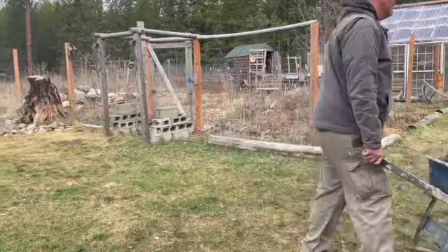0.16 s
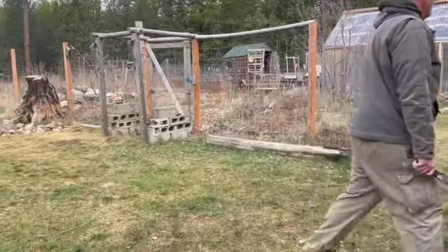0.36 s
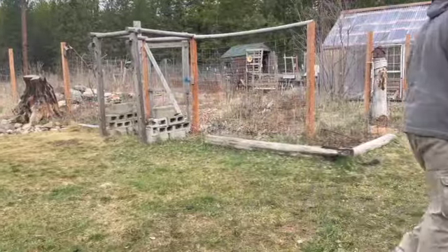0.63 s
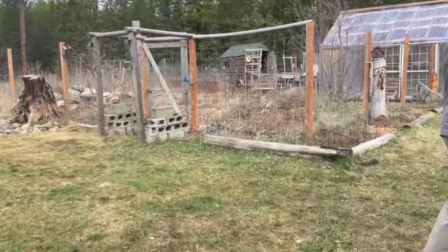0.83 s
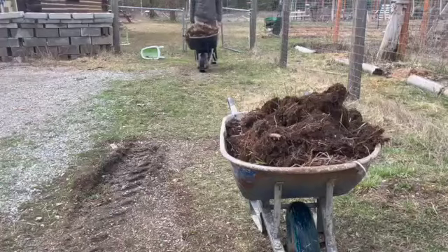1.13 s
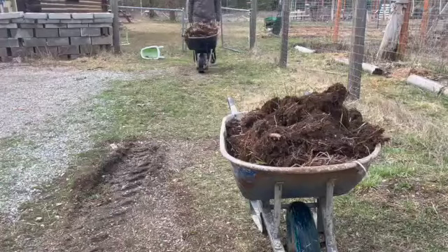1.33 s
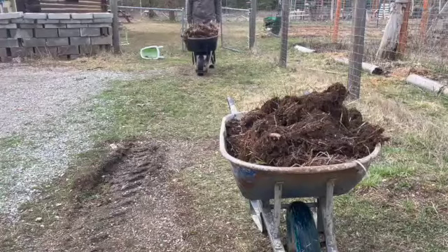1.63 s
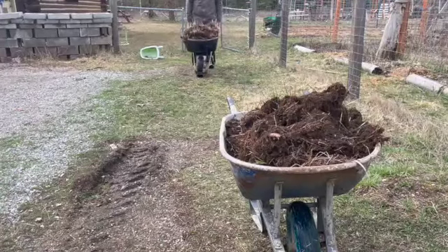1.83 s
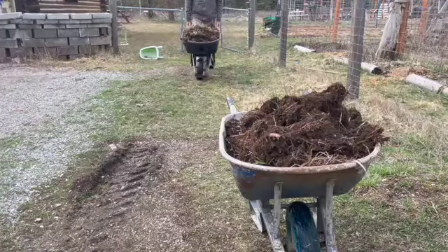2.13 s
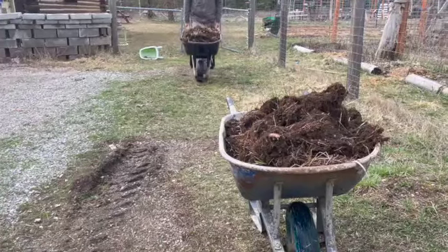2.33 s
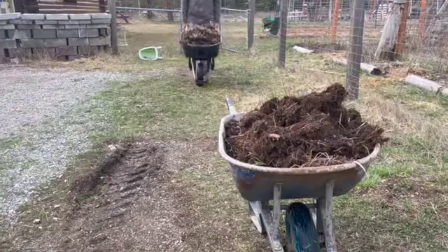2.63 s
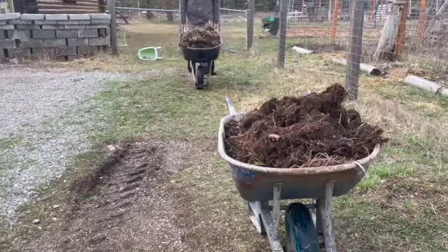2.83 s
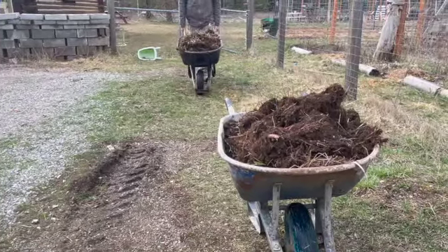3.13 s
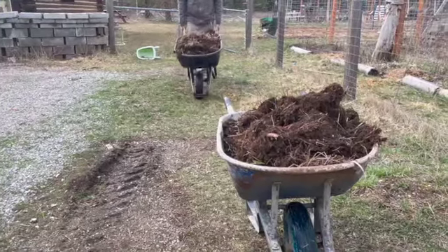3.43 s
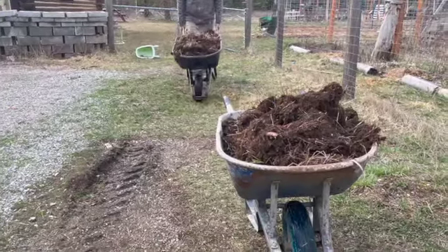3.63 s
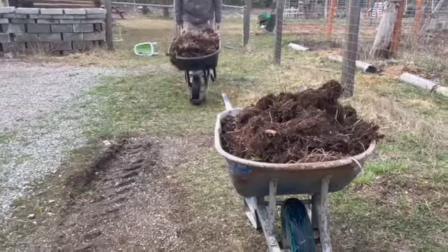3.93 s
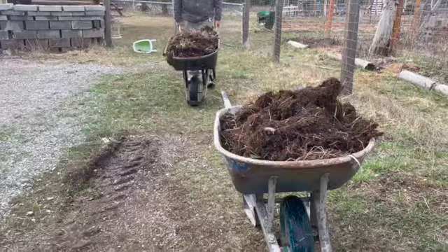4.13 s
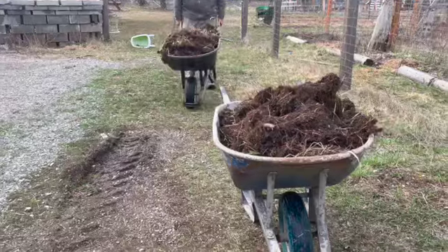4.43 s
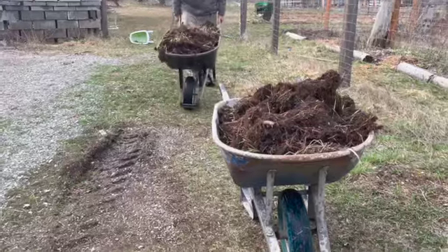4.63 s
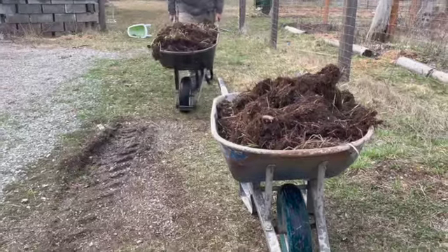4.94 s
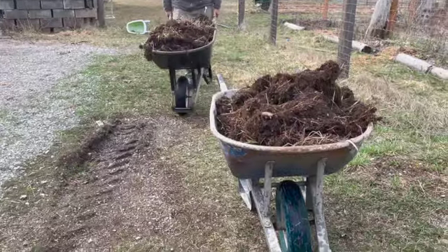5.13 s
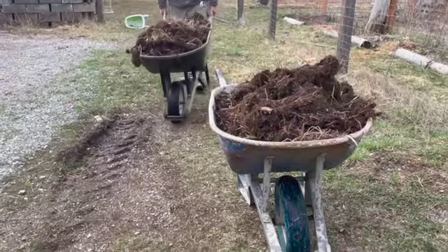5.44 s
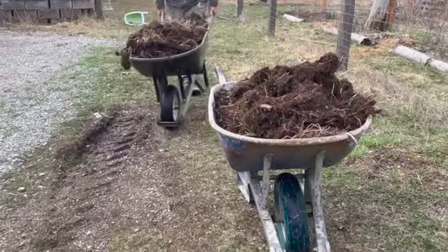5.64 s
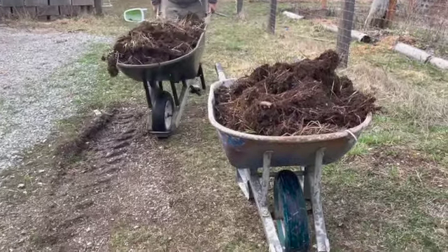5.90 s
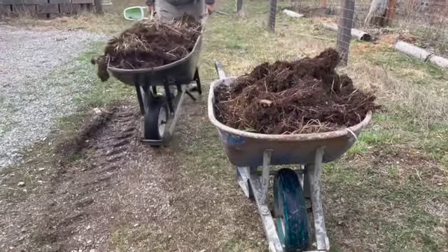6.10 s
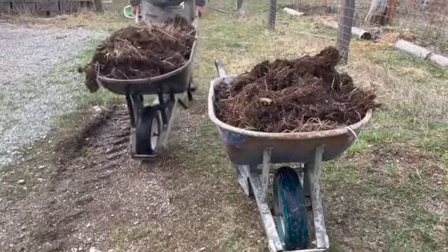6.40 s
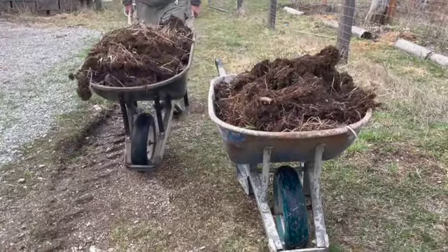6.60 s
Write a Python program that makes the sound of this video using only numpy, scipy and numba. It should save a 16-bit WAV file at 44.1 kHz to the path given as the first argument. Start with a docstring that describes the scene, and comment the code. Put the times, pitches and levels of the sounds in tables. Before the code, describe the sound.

A heavy wheelbarrow comes towards a handheld stereo microphone across grass and gravel. First there is only distant rumble, soft hum and tiny ticks, then a short cut to silence. Bright, scratchy metal creaks follow in irregular clusters, with hollow leg and tub resonances, brief whistles and groans, a dull knock, and finally a raspy, breaking squeal from the axle over thin open-air hiss and light rustle.

```python
"""A loaded wheelbarrow creaks and squeals towards the listener across a yard, after a quiet place and a short gap.
Ragged slips in the dry joints shake resonances of frame, legs and tub; the axle squeals as a shaky harmonic tone.
Gliding sines whistle and groan, and snaps of noise tick underfoot and in the load.
Shaped noise makes the far rumble, hum, open-air hiss, rustle and echoes; two close microphone ports pick it up."""
import sys
import numpy as np
from scipy import signal
from scipy.fft import rfft, irfft, next_fast_len
from scipy.io import wavfile
from scipy.ndimage import uniform_filter1d
from numba import njit

SR = 44100
rng = np.random.default_rng(int(sys.argv[2]) if len(sys.argv) > 2 else 0)


def persist_wave(psi):
    """Save psi, clipped to +-1, as 16-bit WAV."""
    counts = np.round(np.clip(psi, -1, 1) * 32767).astype(np.int16)
    wavfile.write(sys.argv[1], SR, np.atleast_2d(counts).T)


N = 298277
PAD = next_fast_len(N)   # FFT length in samples
SECOND_PLACE_S = 0.97    # the yard with the barrow begins here


def from_db(db):
    """Gain of a level in dB."""
    return 10 ** (np.asarray(db) / 20)


def rms_one(x):
    """Scale to rms 1."""
    return x / np.sqrt(np.mean(x ** 2) + 1e-20)


def in_time(rows, silent=-120):
    s, *columns = np.transpose(rows)
    t = np.arange(N) / SR
    return np.array([np.interp(t, s, c, left=silent, right=silent) for c in columns])


def drift(rate_hz):
    """Random wandering around 0 with rms 1: noise smoothed at a twentieth of the sample rate."""
    r = np.exp(-40 * np.pi * rate_hz / SR)
    noise = rng.standard_normal(N // 20 + 2002)
    slow = signal.lfilter([1], [1, -2 * r, r * r], noise)[2000:]
    return np.interp(np.arange(N) / 20, np.arange(len(slow)), rms_one(slow))


def resonate(x, hz, width_hz):
    """Two-pole resonance with gain 1 on top."""
    r = np.exp(-np.pi * width_hz / SR)
    top = np.array([1, 0, -1]) * (1 - r * r) / 2
    return signal.lfilter(top, [1, -2 * r * np.cos(2 * np.pi * hz / SR), r * r], x + 1e-18)


@njit
def two_pole(x, gain, cosine, r):
    """Resonator whose centre may change at every sample."""
    out = np.zeros(len(x))
    for i in range(2, len(x)):
        out[i] = gain * (x[i] - x[i - 2]) + 1e-18 + 2 * r * cosine[i] * out[i - 1] - r * r * out[i - 2]
    return out


def at_hz(points, column):
    """A column of a frequency table on the FFT grid, joined evenly in log frequency."""
    hz = np.maximum(np.arange(PAD // 2 + 1) * SR / PAD, 1)
    points = np.array(points)
    return np.interp(np.log(hz), np.log(points[:, 0]), points[:, column])


def coloured(spectrum):
    """Two unrelated noises with the given spectrum, rms 1."""
    white = rfft(rng.standard_normal((2, PAD)))
    return rms_one(irfft(white * from_db(at_hz(spectrum, column=1)), PAD)[:, :N])


# Bursts of slipping in the frame.
# Each row: start in seconds, end in seconds, force at the start in dB, force at the end in dB.
CREAKS = [(0.972, 1.005, -29, -42.5), (1.262, 1.328, -32, -33.5), (1.353, 1.424, -39, -36),
          (1.446, 1.456, -39, -41), (1.469, 1.498, -31.5, -38), (1.505, 1.579, -30, -38),
          (1.688, 1.717, -36.5, -58), (1.784, 1.789, -47.5, -56), (2.033, 2.046, -31, -33.5),
          (2.056, 2.141, -28, -34.5), (2.21, 2.255, -32, -39.5), (2.272, 2.32, -29, -54),
          (2.396, 2.428, -27, -46), (2.591, 2.661, -29.5, -34), (2.669, 2.698, -49, -43),
          (2.73, 2.774, -34, -26.5), (2.784, 2.828, -27.5, -23.5), (2.83, 2.899, -24.5, -31),
          (2.903, 2.942, -31.5, -29), (2.946, 3.045, -28, -28.5), (3.055, 3.067, -29, -28.5),
          (3.116, 3.148, -24.5, -51), (3.161, 3.19, -29, -47.5), (3.24, 3.247, -38, -35),
          (3.273, 3.501, -28, -29.5), (3.513, 3.557, -43, -28), (3.6, 3.658, -34, -27),
          (3.688, 3.721, -25.5, -34), (3.822, 3.887, -30.5, -28), (3.893, 4.085, -26.5, -28.5),
          (4.081, 4.104, -22, -26), (4.107, 4.147, -23.5, -25.5), (4.152, 4.169, -25, -39.5),
          (4.477, 4.483, -38, -30), (4.492, 4.537, -30, -26), (4.543, 4.55, -26, -30),
          (4.561, 4.675, -29.5, -30.5), (4.681, 4.71, -28, -34.5), (4.716, 4.747, -29.5, -30),
          (4.757, 4.803, -34, -32.5), (4.824, 4.841, -25, -42), (4.89, 4.904, -29.5, -32),
          (4.925, 4.969, -28, -31.5), (4.979, 5.005, -32, -27.5), (5.016, 5.12, -28.5, -31.5),
          (5.147, 5.212, -32, -42), (5.356, 5.362, -38.5, -35), (5.465, 5.467, -21, -39.5),
          (5.589, 5.592, -24.5, -33.5), (5.622, 5.634, -36.5, -32.5), (5.676, 5.7, -25, -31),
          (5.706, 5.727, -41, -27), (5.902, 5.921, -28, -31.5), (5.975, 5.98, -37, -64),
          (6.099, 6.145, -26.5, -25.5), (6.247, 6.263, -25.5, -29.5), (6.296, 6.322, -25, -23.5),
          (6.353, 6.357, -20, -28.5), (6.376, 6.412, -25.5, -30.5)]


def burst_force():
    """Strength of the slipping: bursts with softened starts and short tails, as the joint lets go and grips."""
    force = np.zeros(N)
    for start, end, start_db, end_db in CREAKS:
        a, b = round(start * SR), round(end * SR)
        force[a:b] = from_db(np.linspace(start_db, end_db, b - a))
    grip = np.exp(-1 / (.0023 * SR))      # the joint grips again within a few ms
    force = np.maximum(force, signal.lfilter([1 - grip], [1, -grip], force))
    loosen = np.exp(-1 / (.0016 * SR))    # and breaks loose faster
    return signal.lfilter([1 - loosen], [1, -loosen], force)


# Moments when the ragged slipping locks onto a nearly steady rate.
# Each row: centre in seconds, rough length in seconds, slips per second.
LOCKS = [(1.29, .05, 350), (1.55, .04, 448), (2.1, .04, 390), (2.825, .05, 476), (2.97, .04, 476),
         (3.015, .04, 357), (3.33, .04, 435), (3.66, .035, 500), (3.92, .05, 430), (4.06, .03, 476),
         (4.7, .03, 640), (5.065, .03, 400), (6.31, .04, 470)]
RAGGED, LOCKED = (.15, 1.8), (.02, .8)   # (jitter as share of a period, spread of sizes in dB)
GRIT_DB = -12   # beside the slips


def slips():
    """Train of uneven clicks, steadier in the locks, with noise as grit between them; rms 1."""
    t = np.arange(N) / SR
    centre, length, locked_rate = np.transpose(LOCKS)
    near = [np.clip(2 - 4 * np.abs(t - s) / span, 0, 1) for s, span in zip(centre, 1.5 * length)]
    lock = np.max(near, axis=0)   # 0 ragged, 1 locked
    rate = np.interp(t, centre, locked_rate) * from_db((1.1 - lock) * drift(25))
    jitter, spread_db = (ragged + (locked - ragged) * lock for ragged, locked in zip(RAGGED, LOCKED))
    at = np.flatnonzero(np.diff(np.floor(np.cumsum(rate / SR))))   # a slip at each full period
    late, size = rng.standard_normal((2, N))[:, at]
    moved = at + (late * jitter[at] / rate[at] * SR).astype(int)
    train = np.zeros(N)
    train[np.clip(moved, 0, N - 1)] = from_db(spread_db[at] * size)
    return rms_one(rms_one(train) + from_db(GRIT_DB) * rng.standard_normal(N))


MODE_WANDER = .005   # each mode's pitch wanders randomly by this share


def wandering(x, hz, width_hz, wander):
    """Resonance with gain 1 on top whose centre wanders."""
    r = np.exp(-np.pi * width_hz / SR)
    cosine = np.cos(2 * np.pi * hz * (1 + MODE_WANDER * wander) / SR)
    return two_pole(x, (1 - r * r) / 2, cosine, r)


# Times in seconds of the four stages, as the barrow turns and nears.
STAGES_S = [1.7, 3.6, 4.9, 6.0]
MODE_SWAY_DB = 1.8   # slow chance in each mode's share


def ring_part(modes, level, motion):
    """One part of the barrow: shaken resonances whose shares change; friction steadies their strength."""
    t, part = np.arange(N) / SR, np.zeros(N)
    # power of white noise through the modes, so that every part starts from equal strength
    power = sum(from_db(stages_db) ** 2 * np.pi * width / SR for hz, width, *stages_db in modes)
    drive = level * motion
    for k, (hz, width, *stages_db) in enumerate(modes):
        sway = drift(7)
        share_db = np.interp(t, STAGES_S, stages_db - 10 * np.log10(power)) + MODE_SWAY_DB * sway
        # the reversed sway serves as the pitch wander
        part += (-1) ** k * wandering(drive * from_db(share_db), hz, width, sway[::-1])
    # friction holds the vibration near what the force allows
    given, taken = uniform_filter1d([level ** 2, part ** 2], size=round(.018 * SR)) + 1e-12
    return part * np.clip(given / taken, .2, 5) ** .45


# Resonances of the joint, the legs, the tub and the friction hiss.
# Each row: pitch in Hz, width in Hz, then the relative share in dB at each of the four stages.
JOINT_MODES = [(2882, 79, 6.5, 0, 1.5, 3), (3063, 254, -13, 0.5, 1.5, -1.5), (3267, 267, 4, 9, 6, 6.5),
               (3385, 280, 10, 7, 2, 3.5), (3884, 143, 3, -4.5, 0.5, -3.5), (4023, 105, 2.5, -5, -2, -3.5),
               (4870, 860, -14.5, -15.5, -12, -11.5), (5070, 82, -14, -6.5, -6, -2.5),
               (7110, 410, -14.5, -16, -17, -20)]
LEG_MODES = [(794, 106, -14, -5, -5, -7.5), (967.5, 21, -6.5, -2.5, -2.5, -19),
             (1050, 15.7, -4, 4.5, 1.5, -7), (1186, 113, -10, -5, -3.5, -7), (1395, 77, -10.5, 3, -6.5, -4),
             (1843, 154, 7, 6, 4.5, 5.5), (1875, 130, 9.5, 8, 4, 2.5), (2072, 61, -8, -1, -2, -1),
             (2342, 115, -25, -4, -3, 0), (2560, 85, -1, -4, -1, 4.5)]
TUB_MODES = [(355, 150, 3, 4.5, 0.3, -5), (407, 86, 5.5, 3.5, -0.8, 3), (472, 14.6, 4.5, -5.5, 2.5, 4.5),
             (583, 290, -13.5, -8.5, -4.5, -7)]
HISS_MODES = [(8720, 3200, 8, 31, 23, 16), (10070, 330, 7, 10, 29, 9), (11700, 11000, -13.5, 2, -27, -24)]
# How strongly the other parts sound beside the joint as the barrow turns and nears.
# Each row: time in seconds, legs in dB, tub in dB, hiss in dB.
PARTS = [(1.0, -2, -13, -10), (1.45, 0, -6.5, -13), (2.05, -4.5, -24.5, -16), (2.3, -4, -14, -14.5),
         (2.65, -7, -23, -13.5), (3.05, -4.5, -14.5, -14), (3.2, -9, -27, -16), (3.55, -5, -14, -14.5),
         (4.15, -6, -12, -12), (4.5, -1, -11.5, -8), (4.75, -0.5, -13.5, -4.5), (5.05, 3, -10, -4.5),
         (5.2, -4.5, -15.5, -16), (5.6, 1, -37, -10), (5.7, 3.5, -10.5, -12), (6.4, 4.5, -8.5, -3.5)]
# legs, tub and hiss follow only a share of the force's swing about its usual level
FOLLOWS, USUAL_DB = [[0.69], [0.54], [0.37]], -35


def creaks():
    """Stick-slip in the dry joints shakes joint, legs, tub and a friction hiss; a strut rings on."""
    force = burst_force()
    swing = (force / from_db(USUAL_DB) + 1e-9) ** np.array(FOLLOWS)
    legs, tub, hiss = swing * from_db(USUAL_DB + in_time(PARTS, silent=None))
    train = slips()
    shaking = rms_one(train + .55 * rng.standard_normal(N))      # the far parts feel the slips blurred
    rubbing = rms_one(.5 * train + rng.standard_normal(N))       # the hiss is mostly plain friction
    out = ring_part(JOINT_MODES, force, train)
    out += ring_part(LEG_MODES, legs, shaking)
    out += ring_part(TUB_MODES, tub, shaking)
    out += ring_part(HISS_MODES, hiss, rubbing)
    strut = resonate(shaking * legs, hz=1075, width_hz=6)   # narrow, so it rings on after each burst
    return out + from_db(16) * strut


# Two passages of axle squeal, before the body colours them.
# Each row: time in seconds, pitch in Hz, level in dB.
SQUEALS = [
    [(0.99, 476, -50), (1.014, 540.5, -46.5), (1.108, 532, -49), (1.145, 459.6, -49), (1.162, 584, -46),
     (1.188, 615, -65), (1.2, 683, -51), (1.278, 678, -53), (1.3, 597, -47)],
    [(5.72, 511, -102), (5.734, 509.4, -36.5), (5.768, 479, -41), (5.79, 515.6, -42.5), (5.815, 510, -35),
     (5.835, 616, -34), (5.885, 579, -35), (5.905, 529.2, -39.5), (5.97, 470.3, -40), (6.042, 565.7, -31),
     (6.06, 521.6, -36), (6.1, 562.6, -32), (6.17, 469.4, -42), (6.195, 557, -27.5), (6.244, 549.7, -34),
     (6.29, 405.6, -38), (6.34, 449.7, -42.5), (6.42, 421.7, -34), (6.443, 591, -29.5),
     (6.462, 565.5, -30.5), (6.478, 489.6, -33), (6.494, 488, -30), (6.508, 442, -35.5),
     (6.523, 547, -29.5), (6.545, 465, -33.5), (6.588, 554, -33.5), (6.6, 544, -63)],
]
# Upper partials of the squeal.
# Each row: time in seconds, second partial in dB, those above in dB.
SQUEAL_EDGE = [(1.09, -2.5, -8), (1.17, -1, -3), (1.3, -18, -14), (5.86, 1.5, -1.5), (6.0, -4, -9),
               (6.24, -3, -13), (6.46, -3.5, -11)]
# The barrow's body colours each partial. Each row: frequency in Hz, gain in dB.
SQUEAL_BODY = [(400, 6), (480, -0.5), (540, -5.5), (690, -2), (850, 4), (1050, -1), (1190, -5.5),
               (1320, 10), (1420, -12.5), (1600, -11.5), (1750, -6.5), (1950, -13), (2250, -14.5),
               (2600, -12.5), (4200, -33)]
SQUEAL_RASP, SQUEAL_BREAK_DB = .45, 3   # depth of roughness, depth of the breaks in dB


def squeal():
    """Regular stick-slip on the axle: a shaky, raspy tone of six partials that breaks as the axle catches."""
    out = np.zeros(N)
    body_hz, body_db = np.transpose(SQUEAL_BODY)
    for rows in SQUEALS:
        a, b = round(rows[0][0] * SR), round(rows[-1][0] * SR)
        pitch, level_db = in_time(rows)[:, a:b]
        second_db, edge_db = in_time(SQUEAL_EDGE, silent=None)[:, a:b]
        phase = 2 * np.pi * np.cumsum(pitch * (1 + .017 * drift(50)[a:b])) / SR
        catch = np.minimum(drift(30), .7)[a:b]   # the axle catches and the whole tone breaks
        for k in range(1, 7):
            db = level_db + np.interp(np.log(k * np.abs(pitch)), np.log(body_hz), body_db)
            db = db + (k == 2) * second_db + (k > 2) * edge_db
            own_break = np.sqrt(k) * np.minimum(drift(32), 1)[a:b] / 2   # higher partials break more
            rasp = 1 + SQUEAL_RASP * drift(200)[a:b]
            uneven = from_db(db + SQUEAL_BREAK_DB * (catch + own_break)) * rasp
            out[a:b] += np.sqrt(2) * uneven * np.sin(k * phase)
    return out


def tub_ring():
    """A tub plate rings on as the squeal stops: one slowly dying sine."""
    start_s, hz, t60_s, db = 6.58, 522, 1.5, -46
    since = np.maximum(np.arange(N) / SR - start_s, 0)
    fade_in = np.minimum(since / 0.018, 1)
    return from_db(db - 60 * since / t60_s) * fade_in * np.sin(2 * np.pi * hz * since)


# Brief gliding tones, from low groans to thin whistles.
# Each row: start in seconds, length in seconds, first pitch in Hz, last pitch in Hz, level in dB.
WHISTLES = [(1.656, 0.018, 3990, 4160, -43), (1.818, 0.28, 3860, 3940, -67),
            (2.284, 0.066, 490, 594, -47.5), (2.981, 0.12, 412, 355, -41), (4.751, 0.041, 3894, 4000, -27),
            (4.891, 0.016, 3850, 3870, -26), (5.041, 0.044, 260, 430, -34.5),
            (5.147, 0.057, 3970, 3797, -29.5), (5.168, 0.051, 1750, 1580, -35),
            (5.296, 0.02, 2514, 2372, -40.5), (5.337, 0.059, 463, 511, -43.5)]
WHISTLE_WAVER_HZ, WHISTLE_RASP = 9, .5   # rms pitch shake, depth of roughness


def whistles():
    """Short gliding sines, a little shaky and raspy, with soft ends."""
    out = np.zeros(N)
    waver = WHISTLE_WAVER_HZ * drift(52)
    rasp = 1 + WHISTLE_RASP * drift(150)
    for s, length, from_hz, to_hz, db in WHISTLES:
        i, n = round(s * SR), round(length * SR)
        pitch = np.linspace(from_hz, to_hz, n) + waver[i:i + n]
        phase = 2 * np.pi * np.cumsum(pitch) / SR
        out[i:i + n] += from_db(db) * np.hanning(n) ** .5 * np.sin(phase)
    return out * rasp


# Small ticks underfoot and in the load.
# Each row: start in seconds, strength in dB, pitch in Hz.
TICKS = [(0.215, -44, 450), (0.391, -41.5, 1860), (0.858, -39, 537), (1.662, -35, 990), (5.338, -26, 526),
         (5.439, -54, 1780), (5.525, -35.5, 1487)]


def ticks():
    """Short dying snaps of noise through a broad resonance."""
    out = np.zeros(N)
    snap = np.exp(-np.arange(600) / (0.0056 * SR))
    for s, db, hz in TICKS:
        i = round(s * SR)
        out[i:i + 600] += 2 * from_db(db) * resonate(rng.standard_normal(600) * snap, hz, 0.64 * hz)
    return out


# Level of the far rumble. Each row: time in seconds, level in dB.
RUMBLE_LEVEL = [(0, -49), (.45, -55), (.92, -49), (1.4, -51.5), (2.0, -54), (4.4, -50.5), (5.5, -52),
                (6.3, -44), (6.76, -53.5)]
# Level of the open-air hiss in the second place. Each row: time in seconds, level in dB.
AIR_LEVEL = [(.97, -54.5), (1.5, -50), (1.9, -55.5), (3.2, -54), (4.4, -56.5), (5.5, -49), (6.05, -50.5),
             (6.76, -50)]
# Spectra of the rumble, the air in the first and second place, and the rustle.
# Each row: frequency in Hz, relative level per Hz in dB.
RUMBLE = [(12, -39), (24, -26), (54, 9), (110, 4.5), (131, 5.5), (166, -7), (236, -23), (323, -14),
          (400, -13), (520, -53)]
FIRST_AIR = [(120, -50), (200, -3), (323, -4), (1060, -16.5), (2440, -13), (3170, -23.5), (7290, -31),
             (8000, -22), (10400, -50)]
AIR = [(120, -1.5), (200, -1), (446, -18), (608, -12), (778, -21), (1060, -15.5), (1490, -14.5),
       (3870, -21.5), (8000, -31.5), (10400, -66)]
RUSTLE = [(3530, -59), (6000, -28), (7400, -4), (9050, -8), (10700, -5.5), (14100, -3.5), (15500, 3.5),
          (16300, -70)]
HUM_HZ, HUM_WIDTH_HZ, HUM_DB = 123.6, 4.9, -55
FIRST_AIR_DB, FIRST_RUSTLE_DB = -63, -72
RUSTLE_DB, NEARING_DB_PER_S = -72.5, 2   # at the second place's start, then rising as the tyre nears


def yard():
    """Far rumble, wavering hum, open-air hiss and the tyre's rustle on the gravel; two unrelated versions."""
    rumble_db, = in_time(RUMBLE_LEVEL, silent=None)
    since = np.arange(N) / SR - SECOND_PLACE_S
    hum = rms_one(resonate(rng.standard_normal((2, N)), HUM_HZ, HUM_WIDTH_HZ))   # narrow noise wavers
    low = from_db(rumble_db + 1.2 * drift(3.0)) * coloured(RUMBLE) + from_db(HUM_DB) * hum
    first_air = from_db(FIRST_AIR_DB) * coloured(FIRST_AIR)
    second_air = from_db(in_time(AIR_LEVEL, silent=None)) * coloured(AIR)
    air = np.where(since < 0, first_air, second_air)   # each place has its own air
    rustle_db = np.where(since < 0, FIRST_RUSTLE_DB, RUSTLE_DB + NEARING_DB_PER_S * since)
    flicker = from_db(1.2 * drift(12))
    return low + flicker * (air + from_db(rustle_db) * coloured(RUSTLE))


ECHO_T60_S, ECHO_DB, ECHO_CUT_HZ = 0.36, -13.5, 22000


def echoes(x):
    """Sheds, walls and trees send back a dying smear: dying noise as echo; two unrelated versions."""
    t = np.arange(int(.6 * SR)) / SR
    roughness = drift(90)   # a fast random drift roughens the echo and smears its pitches
    tail = rng.standard_normal((2, len(t))) * from_db(-60 * t / ECHO_T60_S) * (t > .006)
    tail = signal.sosfilt(signal.butter(1, ECHO_CUT_HZ, fs=SR, output="sos"), tail)
    tail = tail / np.sqrt(np.sum(tail ** 2, axis=1, keepdims=True))
    return from_db(ECHO_DB) * roughness * signal.fftconvolve(x[None], tail, axes=1)[:, :N]


# How the two microphone ports hear each frequency. Each row: frequency in Hz, sum in dB,
# difference in dB, phase of the difference in radians, unrelated part of the difference in dB.
PORTS = [(60, 0, -17, 0, -16), (300, 0, -16, 0, -10), (700, 0, -8.5, 0, -7), (1300, 0, -16, 0, -14),
         (1900, 0, -15, .6, -13), (2250, 0, -8, 1.6, -10), (2700, 0, 0, 1.5, -7), (4000, 0, -5, 1.2, -4),
         (5300, 0, -6, .3, -2), (6500, 0, -6, -.4, -2), (7300, -3, -2, -.7, -3), (8200, -16, -3, -.5, -4),
         (9000, -22, -2, 1.2, -4), (10000, -3, 1, 1.6, -2), (11200, 0, -11, 1.6, -7),
         (13000, 0, -28, 1.4, -23)]
SCATTER_S, SCATTER_DB = .003, -2   # nearby objects scatter the barrow's sound unequally to the ports


def ports(direct, diffuse):
    """Sum and difference of two close ports; scattered and diffuse sound make them differ."""
    scatter = rng.standard_normal(800) * np.exp(-np.arange(800) / (SCATTER_S * SR))
    scattered = signal.fftconvolve(direct, scatter / np.sqrt(np.sum(scatter ** 2)))[:N]
    total = rfft(direct + diffuse[0], PAD)
    unlike = rfft(diffuse[1] + from_db(SCATTER_DB) * drift(18.5) * scattered, PAD)
    mid = irfft(total * from_db(at_hz(PORTS, column=1)), PAD)[:N]
    turn = from_db(at_hz(PORTS, column=2)) * np.exp(1j * at_hz(PORTS, column=3))
    side = irfft(total * turn + unlike * from_db(at_hz(PORTS, column=4)), PAD)[:N]
    return np.array([mid + side, mid - side])


def scene():
    """Barrow, its echoes and the yard at the microphone ports."""
    barrow = creaks() + squeal() + tub_ring() + whistles() + ticks()
    return ports(barrow, echoes(barrow) + yard())


FIRST_END_S, CUTOFF_HZ = 0.93, 16400


def record(dry):
    """A short silence parts the two places; a steep filter removes the highest treble."""
    t = np.arange(N) / SR
    closing = (FIRST_END_S - t) / 0.009        # fades out over 9 ms
    opening = (t - SECOND_PLACE_S) / 0.0008    # fades in over 0.8 ms
    gate = np.clip(np.maximum(closing, opening), 0, 1)
    return signal.sosfilt(signal.cheby2(12, 70, CUTOFF_HZ, fs=SR, output="sos"), dry * gate)


dry = scene()
out = record(dry)
persist_wave(out)
```